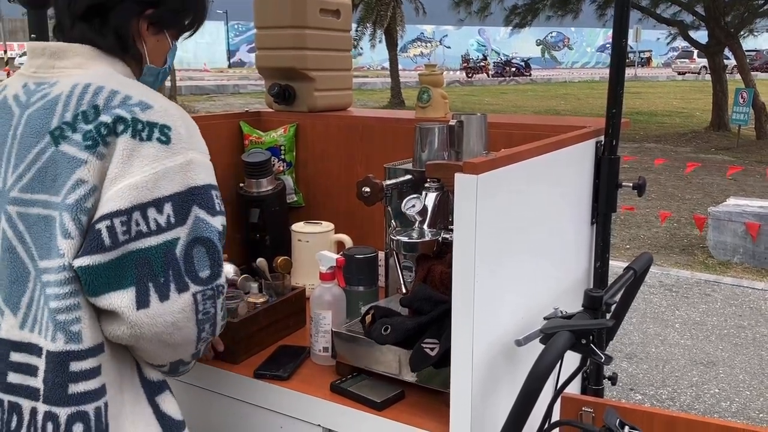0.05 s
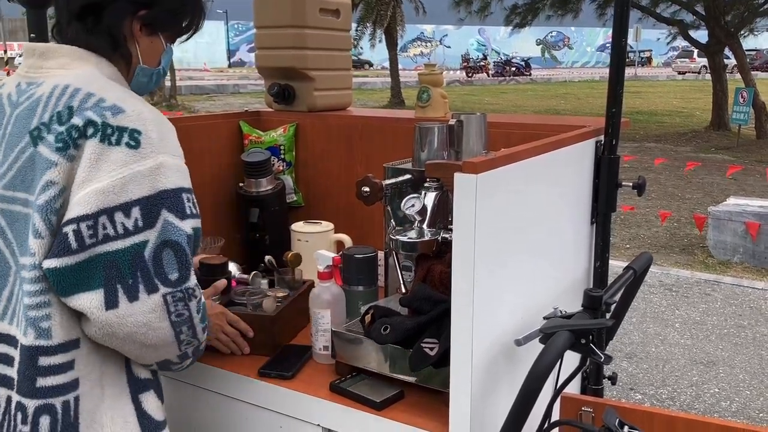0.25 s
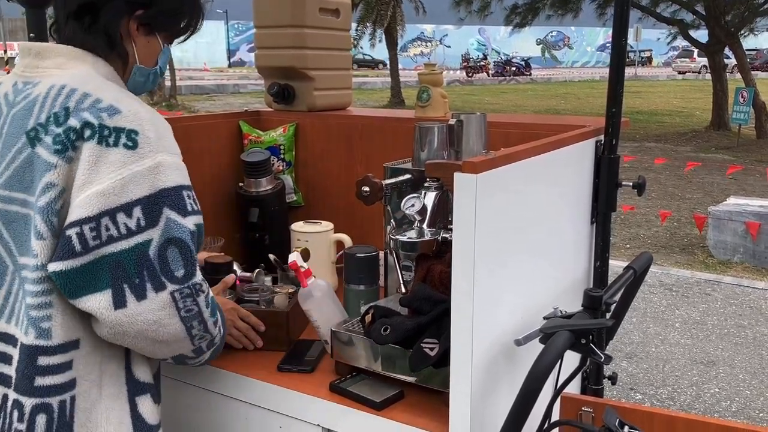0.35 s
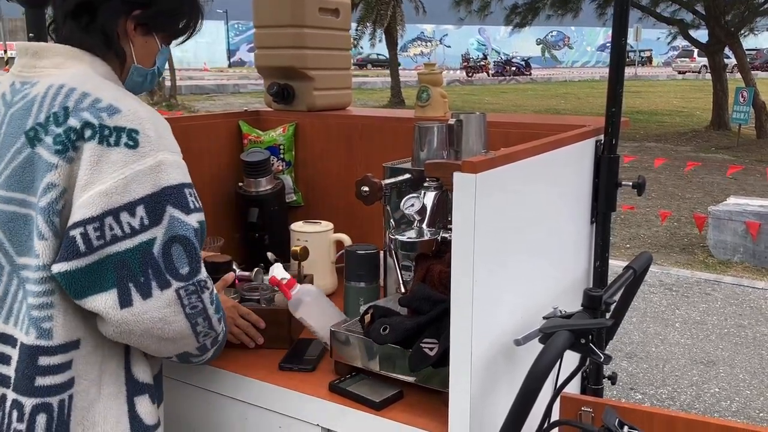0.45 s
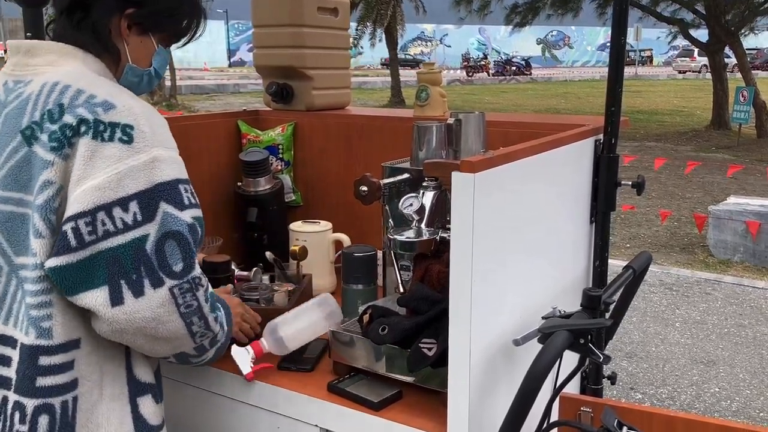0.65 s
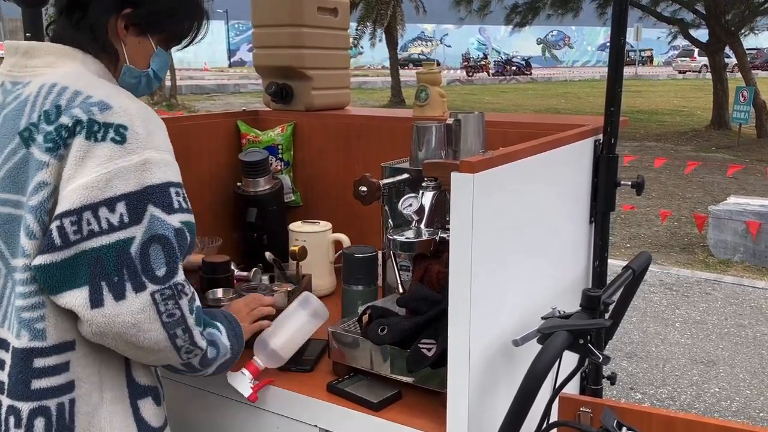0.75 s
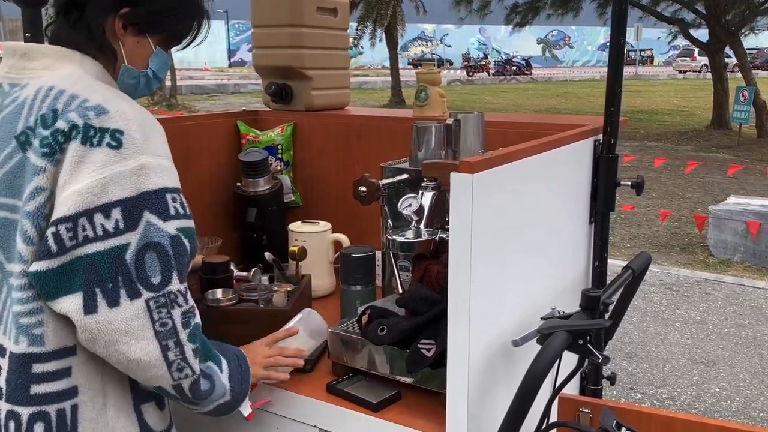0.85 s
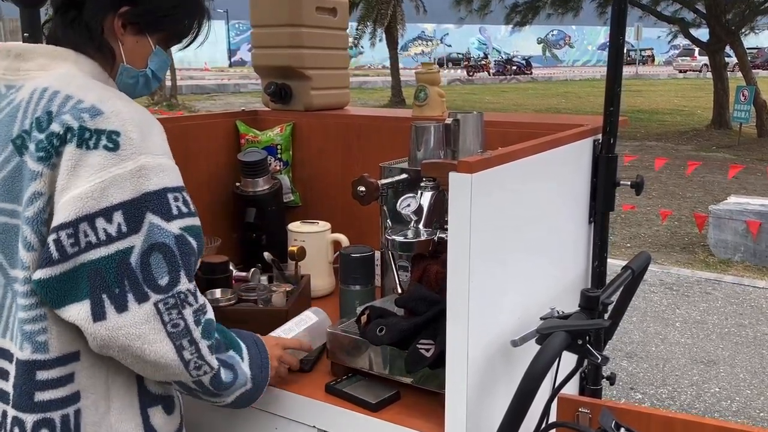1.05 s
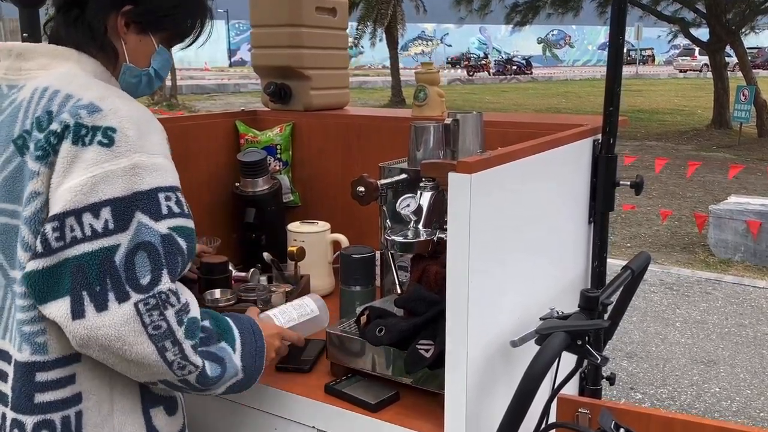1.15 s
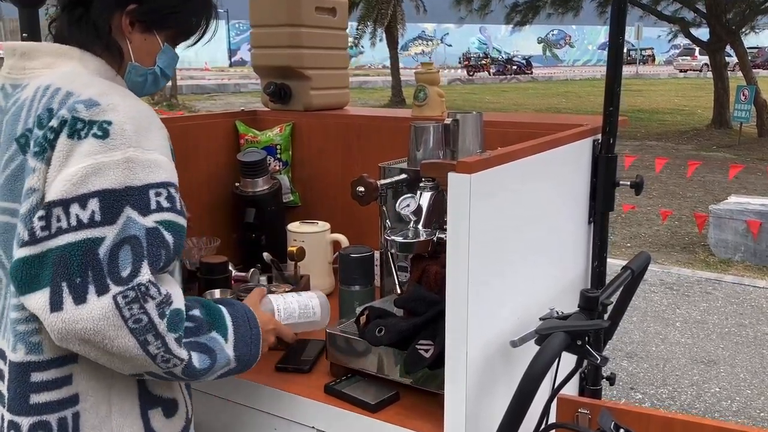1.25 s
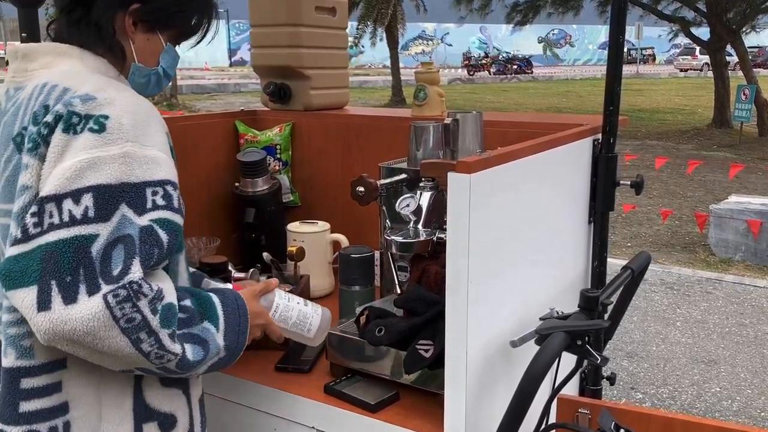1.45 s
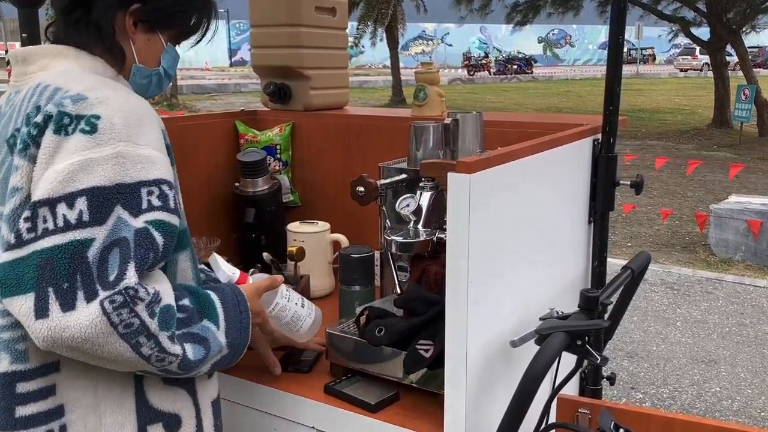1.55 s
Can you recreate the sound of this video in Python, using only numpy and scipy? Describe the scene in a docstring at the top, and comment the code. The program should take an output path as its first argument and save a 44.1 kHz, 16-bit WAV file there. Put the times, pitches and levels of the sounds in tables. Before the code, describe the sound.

A plastic bottle bounces hollowly on a stall counter, knocked over by a wooden box that scrapes and clatters with clinking utensils. Two lighter taps follow as it is caught. Close by, outdoors, with distant traffic rumbling.

```python
"""A plastic spray bottle bounces on a stall counter, toppled by a shoved wooden box, and is caught.
Each contact is a sharp tick, a crack and a woody clack; bottle and box ring in their own modes,
and the hollow counter booms a few milliseconds later. The box scrapes, utensils clink inside it,
the stall's frame thuds and a sleeve rustles. Behind it all, distant traffic rumbles in the open air."""
import sys
import numpy as np
from scipy import signal
from scipy.fft import rfft, irfft
from scipy.io import wavfile
from scipy.ndimage import map_coordinates

SR = 44100
rng = np.random.default_rng(int(sys.argv[2]) if len(sys.argv) > 2 else 0)


def waveform_to_disk(signal):
    """Save audio, clipped to [-1, 1], as 16-bit WAV at the path in sys.argv[1]."""
    frames = np.transpose(np.atleast_2d(signal))
    scaled = np.clip(frames, -1, 1) * 32767
    samples = np.round(scaled).astype(np.int16)
    wavfile.write(sys.argv[1], SR, samples)


N = 70560
BIN_HZ = np.fft.rfftfreq(N, 1 / SR)
SIDES = np.array([[1], [-1]])  # left, right

# bottle hits (time [s], boom [dB], boom pitch [Hz], ring [dB], clack [dB], crack [dB], tick [dB],
# clatter t60 [s])
BOTTLE_BOUNCES = [(0.5872, -18.5, 256.6, -45, -26, -28.5, -35.5, 0.068),
                  (0.6041, -25, 241, -31, -40, -38.5, -35, 0.051),
                  (0.62, -20, 315, -22, -24, -22, -36.5, 0.05),
                  (.7095, -14, 293.3, -58, -34, -34.5, -39, 0.053),
                  (0.7248, -27.5, 271, -32.5, -36, -37, -41.5, 0.063),
                  (0.7827, -19.5, 310, -34, -23, -30.5, -37, 0.03),
                  (0.8031, -8, 312, -43, -19, -34.5, -35, 0.078),
                  (0.8316, -10.5, 307.3, -26, -20, -38, -54, 0.075),
                  (0.8455, -17.5, 297, -12.5, -23.5, -34.5, -37.5, 0.087)]
# hollow ring of the bottle (frequency [Hz], level [dB], t60 [s])
BOTTLE_MODES = [(716, -10.5, 0.1), (859, -3.5, 0.021), (964, -3, 0.026), (1300, -32, 0.1),
                (1450, -33, 0.032)]
def bottle():
    """The bottle tumbles with a plastic snap, rings hollowly and drums on the counter."""
    out = contacts(BOTTLE_BOUNCES, snap=1.78)
    for start, boom_db, boom_hz, ring_db, *_ in BOTTLE_BOUNCES:
        t = since(start)
        out += undb(ring_db) * ring(t, BOTTLE_MODES) + undb(boom_db) * counter_boom(t, boom_hz)
    return out


# box hits (time [s], boom [dB], ring [dB], clack [dB], crack [dB], tick [dB], clatter t60 [s])
BOX_KNOCKS = [(.129, -54, -38.5, -44, -49.5, -50.5, 0.17), (.156, -64, -38, -33, -44, -46.5, 0.11),
              (0.2245, -57, -25.5, -30.5, -29, -35.5, 0.031), (0.2334, -26, -24, -28, -27, -32.5, 0.038),
              (0.243, -22.5, -23.5, -17.5, -28.5, -38.5, 0.044), (0.2517, -34, -30, -21, -20.5, -48, 0.017),
              (.2565, -51, -20.5, -22, -29.5, -33, 0.07), (0.3007, -23, -19.5, -21, -33, -31, 0.092),
              (.3140, -20.5, -43, -40, -35, -32, 0.022), (0.3326, -32, -31.5, -20.5, -30.5, -37.5, 0.05),
              (0.3705, -43, -61, -38, -43.5, -42.5, 0.082), (0.496, -32, -45, -43, -40, -46.5, 0.049),
              (0.5053, -29, -22, -27, -33.5, -43.5, 0.12), (.5170, -37, -18.5, -33, -38.5, -49, 0.099)]
# woody ring of the box (frequency [Hz], level [dB], t60 [s])
BOX_MODES = [(380, -30, 0.32), (606, -25.5, 0.18), (745, -8.5, 0.098), (868, 2, 0.019), (1185, -16.5, 0.12),
             (1409, -19.5, 0.15), (1738, -12.5, 0.07), (1848, -20, 0.2), (2206, -23, 0.15),]
def box():
    """The box knocks against the counter and its neighbours and rings."""
    out = contacts(BOX_KNOCKS, snap=0.077)
    for start, boom_db, ring_db, *_ in BOX_KNOCKS:
        t = since(start)
        out += undb(ring_db) * ring(t, BOX_MODES) + undb(boom_db) * counter_boom(t, hz=360)
    return out


# body of the counter (multiple of boom pitch [ratio], level [dB], t60 [s])
COUNTER_MODES = [(0.758, -4.5, 0.057), (1.002, -6, 0.11), (1.17, -7, 0.066), (1.66, -15.5, 0.074)]
def counter_boom(t, hz, delay_s=.0106, width_s=.0035):
    """The hollow counter swells for a few cycles after a hit, then rings briefly."""
    late = t - delay_s
    phase = 2 * np.pi * hz * late
    bloom = np.exp(-.5 * (late / width_s) ** 2) * np.cos(phase) * (t > 0)
    after = np.maximum(late, 0)
    return bloom + sum(undb(db) * burst(after, 0.0021, t60) * np.cos(ratio * phase)
                       for ratio, db, t60 in COUNTER_MODES)


# EQ of the low clack, mid crack and bright tick of a hit (frequency [Hz], level [dB])
CLACK_EQ = [(100, -64), (250, 9.5), (420, 4), (560, 3.5), (760, 5), (1000, 2), (1250, -15.5), (1800, -16),
            (4000, -68)]
CRACK_EQ = [(600, -73), (1170, 4.5), (1850, -1), (2200, -1.5), (2700, 0), (3350, -18.5), (5000, -15.5),
            (9000, -43)]
TICK_EQ = [(2000, -47), (3500, -5), (4400, 4), (5700, -5.5), (7500, 6), (11500, 6.5), (15000, -4),
           (16500, -23)]
def contacts(hits, snap):
    """Three noise bursts a hit, each hit on another spot; snap adds bite to the tick's attack."""
    out, length = np.zeros((2, N)), SR // 8
    t = since(0)[:length]
    # (EQ, rise [s], t60 scale, stereo spread, bite)
    layers = [(CLACK_EQ, .0015, 1, .2, 0), (CRACK_EQ, .0008, 1, .36, 0),
              (TICK_EQ, .00045, .96, .36, snap)]
    for band, (eq, rise_s, t60_scale, spread, bite) in enumerate(layers):
        source, tail_power = noise(eq, spread), 0
        attack = 1 + bite * np.exp(-t / .0012)
        for start, *_, clack_db, crack_db, tick_db, t60 in hits:
            gain = undb((clack_db, crack_db, tick_db)[band])
            at, pick = int(start * SR), rng.integers(N - length)
            envelope = gain * attack * burst(t, rise_s, t60 * t60_scale)
            out[:, at:at + length] += envelope * ripple(source[:, pick:pick + length])
            tail_power += (gain * undb(-25.5) * burst(since(start), rise_s=0.004, t60=0.56)) ** 2
        out += np.sqrt(tail_power) * noise(eq, spread=0.14)  # faint scatter round the stall
    return out


def ring(t, modes):
    """Struck modes; every blow varies their level and tuning a little."""
    out = 0
    for hz, db, t60 in modes:
        level, detune = rng.standard_normal(2)
        tone = np.sin(2 * np.pi * hz * (1 + 0.0074 * detune) * t)
        out += undb(db + 0.5 * level) * burst(t, 0.00064, t60) * tone
    return out


def ripple(x, depth_db=3.8, spacing_hz=130):
    """Dense upper resonances: random peaks and dips, shallower below 2 kHz, at rms 1."""
    hz = np.fft.rfftfreq(x.shape[-1], 1 / SR)
    peaks = map_coordinates(rng.standard_normal(2048), [hz / spacing_hz], mode="mirror")
    gain = undb(depth_db * peaks * np.minimum(hz / 2000, 1))
    return unit(irfft(rfft(x) * gain, x.shape[-1]))


# taps of the catch (time [s], ring [dB], clack [dB], crack [dB], tick [dB], clatter t60 [s])
CATCH_TAPS = [(0.9611, -20.5, -31.5, -31, -46, 0.12), (1.0696, -30, -36, -47, -53.5, 0.063)]
# ring of the tapped object (frequency [Hz], level [dB], t60 [s])
TAP_MODES = [(652, -10.5, 0.18), (870, 5, 0.015), (1380, -24, 0.22), (1770, -22, 0.18), (1884, -9, 0.045),
             (2320, -25, 0.26)]
def catch_taps():
    """The caught bottle taps something hard beside it, which rings with a clear pitch."""
    clatter = contacts(CATCH_TAPS, snap=0.86)
    return clatter + sum(undb(db) * ring(since(start), TAP_MODES) for start, db, *_ in CATCH_TAPS)


# fader ride of the scrape (time [s], level [dB])
SLIDE_FADER = [(.03, -71), (.12, -80), (.20, -62), (.235, -31.5), (.262, -22), (.285, -40), (0.322, -26.5),
               (0.351, -39.5), (.41, -49.5), (.52, -71)]
# EQ of wood scraping the counter (frequency [Hz], level [dB])
SLIDE_EQ = [(50, -4.5), (170, 11), (350, -17), (900, 6.5), (1500, -27), (2700, -4), (3400, -22),
            (7000, -15.5), (11500, -23), (16000, -45)]
def box_slide(grains_per_s=1100, scatter_db=2):
    """Dense stick-slip grains over friction noise while the box moves."""
    slips = rng.random(N) < grains_per_s / SR
    grains = colour(slips * undb(scatter_db * rng.standard_normal(N)), SLIDE_EQ)
    friction = ripple(noise(SLIDE_EQ, spread=0.079))
    return fader(SLIDE_FADER) * (0.53 * grains + .5 * friction)


# utensil hits (time [s], level [dB])
CLINKS = [(.226, -22), (0.233, -26.5), (.2625, -28), (0.335, -34)]
# metallic ring of the utensils (frequency [Hz], level [dB], t60 [s])
UTENSIL_MODES = [(2604, -0.5, 0.026), (2890, -5.5, 0.04), (4730, -17, .05), (6600, -20, 0.054)]
def utensils():
    """Metal utensils jostle and clink inside the moving box."""
    return sum(undb(db) * ring(since(start), UTENSIL_MODES) for start, db in CLINKS)


# low thuds of the frame (time [s], frequency [Hz], level [dB])
FRAME_THUDS = [(0.265, 74.2, -25), (0.405, 262.4, -34), (0.503, 173.4, -33), (0.884, 215, -33),
               (0.954, 57.8, -29), (1.531, 66, -28.5)]
def stall_frame():
    """Heavier pushes shake the stall's frame, one damped low tone each."""
    out = 0
    for start, hz, db in FRAME_THUDS:
        t = since(start)
        out += undb(db) * burst(t, rise_s=0.0046, t60=0.28) * np.sin(2 * np.pi * hz * t)
    return out


# fader ride of the rustle (time [s], level [dB])
SLEEVE_FADER = [(.03, -82), (.11, -58), (.2, -51.5), (.26, -42.5), (.38, -88), (.46, -76), (.7, -87),
                (.82, -48.5), (.88, -49.5), (.94, -62), (1.1, -66)]
# airy EQ of the cloth (frequency [Hz], level [dB])
SLEEVE_EQ = [(1000, 0.5), (3000, -1), (5500, -2.5), (7700, 2), (15500, -8)]
def sleeve():
    """Cloth brushes as the arm moves."""
    return fader(SLEEVE_FADER) * ripple(noise(SLEEVE_EQ, spread=0.36))


# EQ of the traffic bed (frequency [Hz], level [dB])
TRAFFIC_EQ = [(20, -54), (45, -11.5), (70, -0.5), (110, -6.5), (195, -7), (260, -17.5), (450, -17.5),
              (560, -28), (800, -24.5), (1200, -32.5), (2300, -39.5), (7500, -57.5), (11000, -63),
              (16000, -76)]
# drones and whines of distant engines (frequency [Hz], level [dB])
ENGINE_DRONES = [(65, -46), (184, -55), (307, -54.5), (432, -58.5), (2320, -69.5), (4400, -78)]
def traffic():
    """Distant rumble, wider in the treble than the bass, with narrow noise bands as engine drones."""
    mid, side = (colour(rng.standard_normal(N), TRAFFIC_EQ) for _ in range(2))
    width = undb(curve([(70, -12), (250, -6.5), (900, 0), (3000, 2)]))
    side = irfft(rfft(side) * width, N)
    out = undb(-41) * (mid + side * SIDES)
    for hz, db in ENGINE_DRONES:
        half_width_hz = 6.8 + 0.0071 * hz
        peak = 1 / (1 + ((BIN_HZ - hz) / half_width_hz) ** 2)
        out += undb(db) * unit(irfft(rfft(rng.standard_normal(N)) * peak, N))
    return out


def undb(db):
    """Decibels to gain."""
    return 10 ** (np.asarray(db) / 20)


def unit(x):
    """Scale to rms 1."""
    return x / np.sqrt(np.mean(x ** 2))


def curve(points):
    """Draw a (frequency [Hz], level [dB]) curve through every frequency bin."""
    hz, db = np.array(points, float).T
    return np.interp(np.log(BIN_HZ + 1), np.log(hz), db)


def colour(x, eq):
    """Apply an EQ curve and scale to rms 1."""
    return unit(irfft(rfft(x) * undb(curve(eq)), N))


def noise(eq, spread):
    """Coloured stereo noise; spread is the gain of the side against the mid."""
    mid, side = rng.standard_normal((2, N))
    return colour(mid + spread * side * SIDES, eq)


def since(start):
    """Seconds since a moment, zero before it."""
    return np.maximum(np.arange(N) / SR - start, 0)


def burst(t, rise_s, t60):
    """Percussive envelope: quick rise, exponential decay."""
    return (1 - np.exp(-t / rise_s)) * np.exp(-np.log(1000) * t / t60)


def fader(points):
    """Gain from a (time [s], level [dB]) ride, silent outside it."""
    times, db = np.array(points).T
    return undb(np.interp(since(0), times, db, left=-np.inf, right=-np.inf))


# pan of the counter (frequency [Hz], left minus right [dB])
COUNTER_PAN = [(100, -1), (300, 1.1), (550, 3), (950, 3.5), (1500, 9.5), (2200, 2), (5000, 0)]
def scene():
    """The counter lies to the left, arriving earlier and louder there; traffic fills both sides."""
    counter = box() + utensils() + box_slide() + bottle() + catch_taps() + stall_frame() + sleeve()
    lag_s, lag_top_hz = 0.00015, 1710  # the phase lead levels off above lag_top_hz
    lead = 2 * np.pi * lag_s * lag_top_hz * np.tanh(BIN_HZ / lag_top_hz)
    pan = undb(SIDES / 2 * curve(COUNTER_PAN)) * np.exp(1j * lead * SIDES / 2)
    return irfft(rfft(counter) * pan, N) + traffic()


# treble notches of the microphone ports (frequency [Hz], width [Hz])
PORT_NOTCHES = [(9300, 1960), (13700, 2000)]
def record(dry):
    """The microphone's ports notch the treble; a steep low-pass cuts the top."""
    dry = dry * np.minimum(since(0) / .002, 1)  # soft start
    for hz, width in PORT_NOTCHES:
        dry = signal.lfilter(*signal.iirnotch(hz, hz / width, fs=SR), dry)
    return signal.sosfilt(signal.ellip(8, .2, 80, 16500, fs=SR, output="sos"), dry)


dry = scene()
out = record(dry)
waveform_to_disk(out)
```